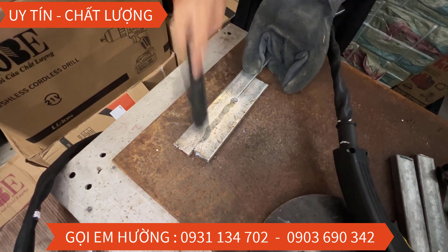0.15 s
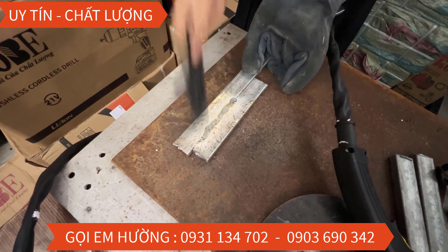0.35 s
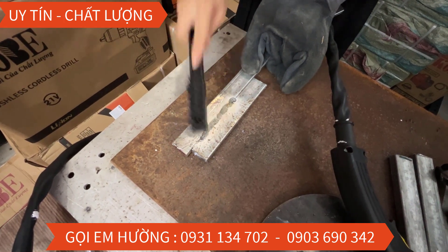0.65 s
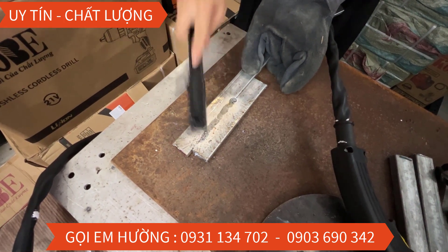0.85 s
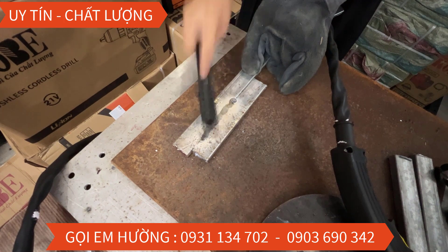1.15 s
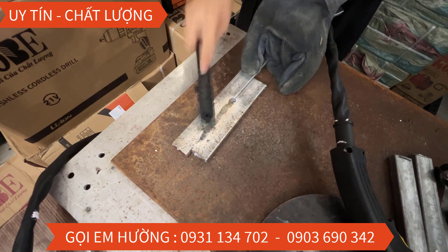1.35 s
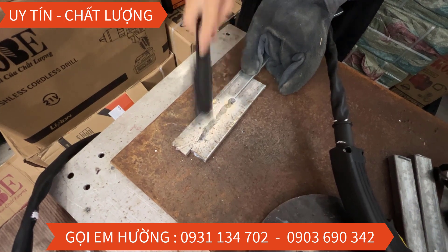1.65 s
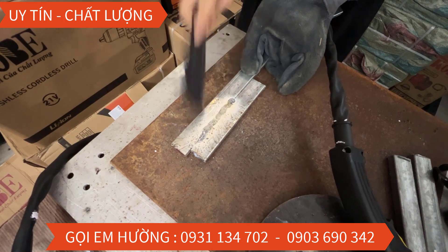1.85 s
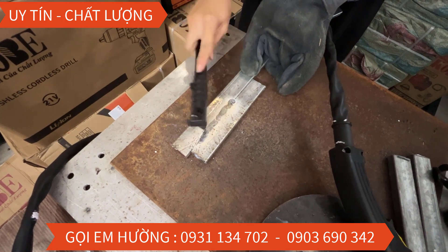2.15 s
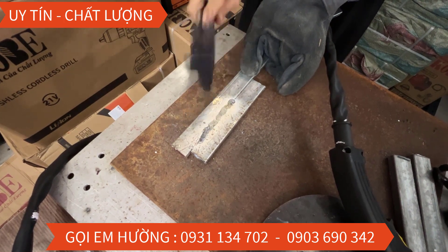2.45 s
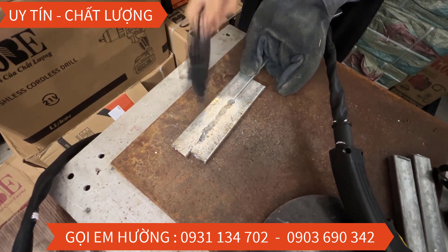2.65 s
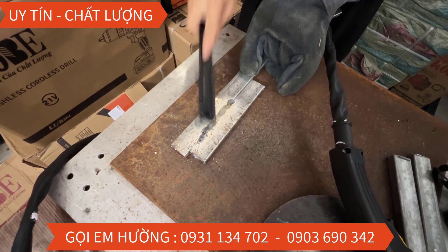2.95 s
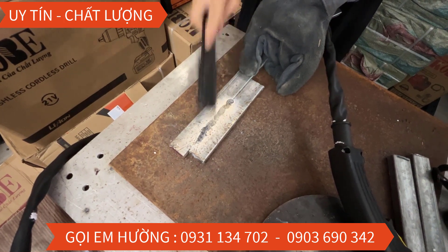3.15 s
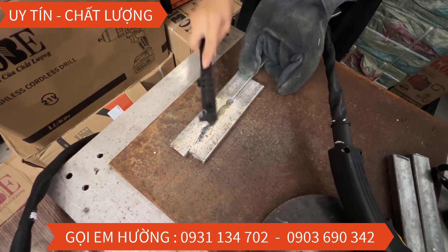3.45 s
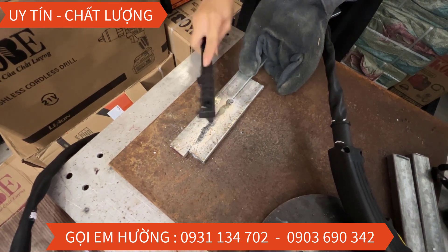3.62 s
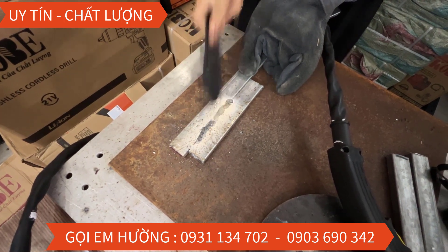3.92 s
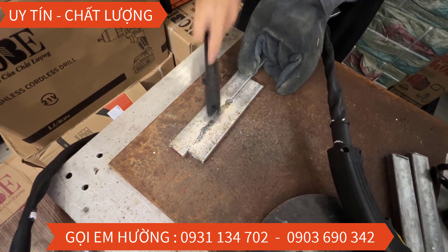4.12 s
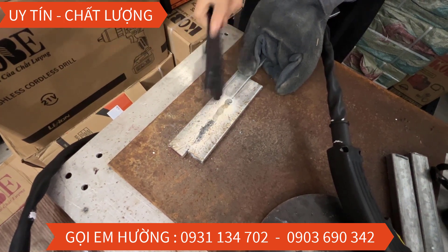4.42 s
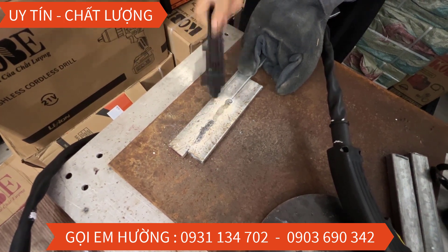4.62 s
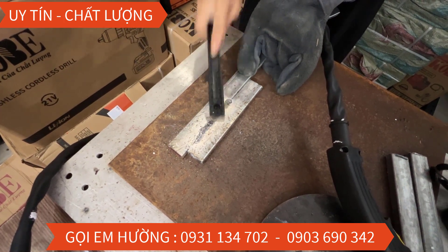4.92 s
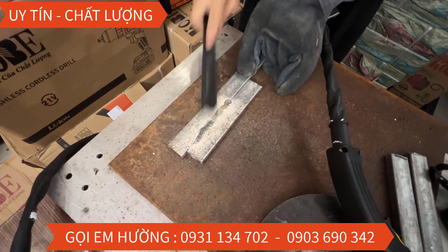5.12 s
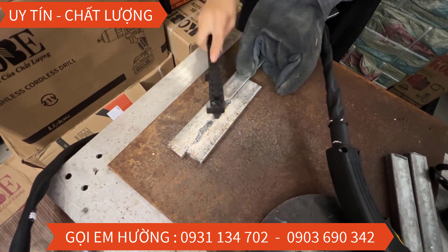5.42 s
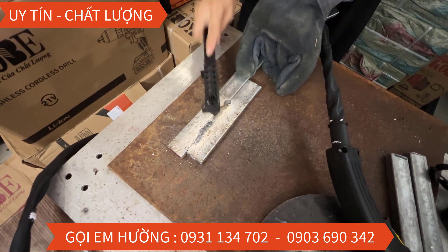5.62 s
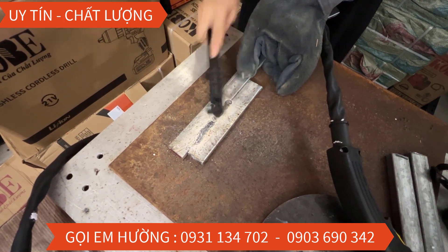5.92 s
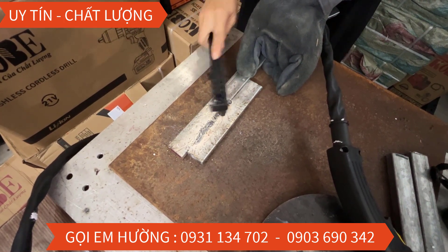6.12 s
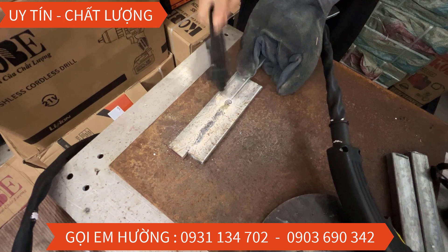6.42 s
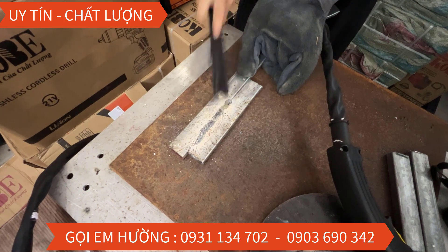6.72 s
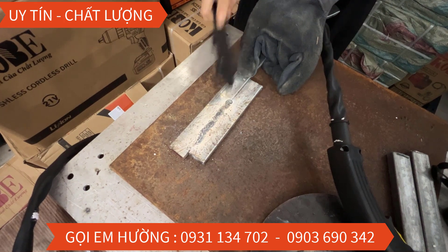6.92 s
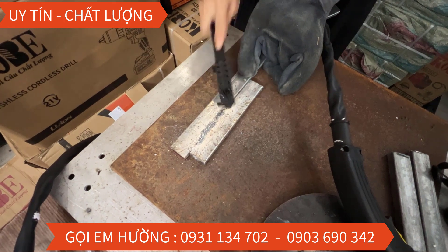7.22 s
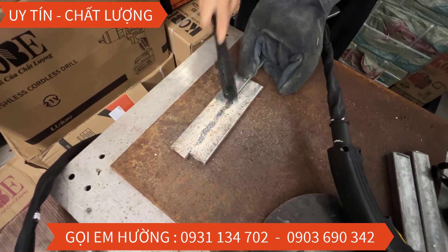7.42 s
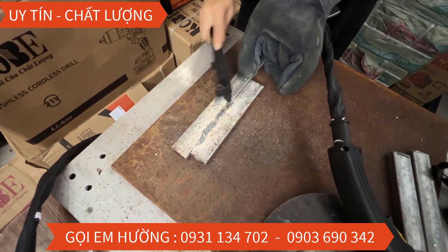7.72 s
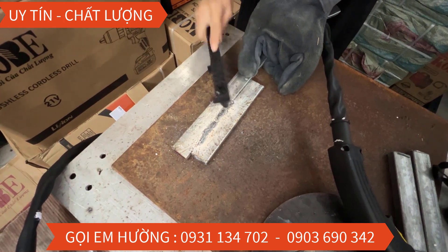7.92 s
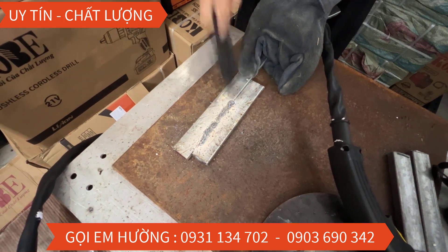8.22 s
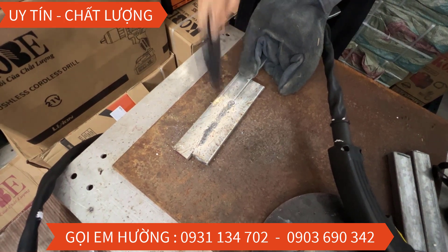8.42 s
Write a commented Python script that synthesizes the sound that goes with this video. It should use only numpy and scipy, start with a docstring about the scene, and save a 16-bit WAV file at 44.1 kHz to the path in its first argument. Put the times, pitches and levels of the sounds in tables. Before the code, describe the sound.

A steel chipping hammer taps fast and evenly along a weld bead, sharp metallic clacks with brief rings and low bench thuds.

```python
"""Sharp metallic clacks, five or six a second: a steel chipping hammer taps along a weld bead on a held-down strip.
Each blow is a dispersed burst of noise, then dense noise partials and decaying, beating sines for the ringing
steel, in a mix of modes that changes as the point walks up the bead.
Low, filtered noise makes the bench thud underneath; a small, cluttered workshop answers with decaying noise,
over a faint rumble of steady noise."""
import sys
import numpy as np
from scipy import signal
from scipy.fft import rfft, irfft, next_fast_len
from scipy.io import wavfile

SR = 44100
rng = np.random.default_rng(int(sys.argv[2]) if len(sys.argv) > 2 else 0)


def file_out(sig):
    """Save sig as 16-bit WAV at sys.argv[1]."""
    # one column per channel
    cols = np.atleast_2d(sig).T
    # limit, then scale
    lim = np.clip(cols, -1, 1)
    pcm = np.round(lim * 32767).astype(np.int16)
    wavfile.write(sys.argv[1], SR, pcm)


N = 377693
SIZE = 24576  # samples given to each blow
AGE = np.arange(SIZE) / SR  # seconds since a blow


def undb(db):
    """Level to amplitude: 20 dB is a factor of ten."""
    return 10 ** (np.asarray(db) / 20)


def fade(t60):
    """Exponential damping: the amplitude loses 60 dB in t60 seconds."""
    return np.exp(-np.log(1000) * AGE / t60)


def unit(x):
    """Energy normalisation: the squares sum to one."""
    return x / np.sqrt(np.sum(x ** 2))


def colour(x, points, tilt_db=0, lift_db=0):
    """Minimum-phase filtering through (Hz, dB) points; tilt_db raises treble against mids, lift_db adds resonances."""
    size = x.shape[-1]
    hz, db = np.transpose(points)
    log_f = np.log(np.maximum(np.fft.rfftfreq(size, 1 / SR), 1))
    tilt = np.interp(log_f, np.log([2500, 8000]), [-.35, .65])
    bass_cut_db = 20 * np.maximum(np.log(hz[0]) - log_f, 0)  # below the first point
    response_db = np.interp(log_f, np.log(hz), db) + tilt_db * tilt + lift_db - bass_cut_db
    # folding the cepstrum onto positive times makes the filter causal
    cepstrum = irfft(np.log(undb(response_db)), size)
    cepstrum[1:size // 2] *= 2
    cepstrum[size // 2 + 1:] = 0
    return irfft(rfft(x) * np.exp(rfft(cepstrum)), size)


def field(size=SIZE, apart_hz=1100, bass_side=0.4):
    """Diffuse-field coherence: stereo white noise, much alike in the bass and unrelated in the treble."""
    mid, side = rfft(rng.standard_normal((2, size)))
    share = np.clip(bass_side + np.fft.rfftfreq(size, 1 / SR) / apart_hz / 2, 0, 1)
    left_right = np.array([mid + share * side, mid - share * side])
    return irfft(left_right / np.sqrt(1 + share ** 2), size)


def vary(pattern, fresh):
    """Partial correlation: the same vibration pattern struck again, with a share of its power new."""
    fresh = np.clip(fresh, 0, 1)
    return np.sqrt(1 - fresh) * pattern + np.sqrt(fresh) * field()


def partials(noise, spacing_hz=22, spread_db=5):
    """Modal density: gather a noise into close, unequal partials, as a crowd of weak modes does."""
    hz = np.fft.rfftfreq(SIZE, 1 / SR)
    heights = rng.standard_normal(len(hz))
    height_db = spread_db * np.interp(hz / spacing_hz, np.arange(len(hz)), heights)
    ringing = irfft(rfft(noise) * undb(height_db), SIZE)
    return ringing / ringing.std()


def disperse(x, lag_s):
    """Dispersion: bending waves travel faster the higher they are; lag_s is the travel time at 1 kHz."""
    hz = np.fft.rfftfreq(SIZE, 1 / SR)
    phase = 4 * np.pi * lag_s * np.sqrt(1000 * hz)
    # time counts from the arrival of the highest waves
    phase = phase - hz * (phase[-1] - phase[-2]) / hz[1]
    return irfft(rfft(x) * np.exp(-1j * phase), SIZE)


def along(place, near, middle, far):
    """Linear interpolation at a place along the bead, 0 near end to 1 far end."""
    toward_near = np.clip(1 - 2 * place, 0, 1)
    toward_far = np.clip(2 * place - 1, 0, 1)
    return middle + (near - middle) * toward_near + (far - middle) * toward_far


def workshop():
    """Stationary noise shaped by resonance: soft, low room noise that gathers near 106 Hz."""
    # Steady background spectrum. Each row: frequency in Hz, relative level in dB per Hz.
    air_spectrum = [(25, -16), (55, -8), (85, -5), (106, 3), (135, -4), (260, -5), (700, -14), (2000, -20),
                    (6000, -33), (14000, -52)]
    # The background settles after the first seconds. Each row: time in seconds, level in dB.
    air_level = [(0, -50.5), (1.3, -60.5), (2.3, -61.5), (3, -65), (6.5, -62), (8.5, -61)]
    air = colour(field(size=next_fast_len(N)), air_spectrum)[:, :N]
    level_db = np.interp(np.arange(N) / SR, *np.transpose(air_level))
    return undb(level_db) * air / air.std()


def walls(pattern, bright_db, t60=0.2, rise_s=0.022, linger_t60=1.0, linger_db=-24, gain_db=4):
    """Reverberation: reflections build up and die away, nearly alike for every blow; a faint ring lingers."""
    # The workshop's reverberation. Each row: frequency in Hz, relative level in dB.
    room_spectrum = [(130, -15.5), (280, -8.5), (700, -8.5), (950, 0.3), (1350, -0.5), (1900, 4.5),
                     (3000, -3.5), (3900, -4.5), (5000, -2), (6000, -8.5), (8800, -11), (10500, -19.9),
                     (13000, -27), (15000, -62)]
    decay = fade(t60) + undb(linger_db) * fade(linger_t60)
    envelope = decay * (1 - np.exp(-AGE / rise_s))
    reflections = vary(pattern, fresh=0.15) * unit(envelope)
    return undb(gain_db) * colour(reflections, room_spectrum, bright_db)


def bench(pattern, t60=0.18, rise_s=0.0012, gain_db=0):
    """Inertia of a large mass: the heavy bench answers low, with a damped thud."""
    # The bench top giving under a blow. Each row: frequency in Hz, relative level in dB.
    thud_spectrum = [(22, -14), (36, -6.5), (54, 2), (75, 1), (110, -0.5), (170, -6), (300, -9.5),
                     (900, -59)]
    envelope = fade(t60) * (1 - np.exp(-AGE / rise_s))
    return undb(gain_db) * colour(vary(pattern, fresh=0.12) * unit(envelope), thud_spectrum)


def dense_ring(pattern, bright_db, lift_db, t60=0.11, rise_s=0.02, gain_db=2.0):
    """Modal overlap: bending waves spread through the plate and fill it with overlapping modes."""
    # The crowd of weak, quickly damped modes of plate and bench.
    # Each row: frequency in Hz, relative level in dB.
    ring_spectrum = [(130, -2.4), (280, 2), (700, 4), (950, 2.5), (1350, 14), (1900, 11.5), (3000, 12.5),
                     (3900, 5.5), (5000, 6.5), (6000, 5.5), (8800, -4), (10500, -6.5), (13000, -8),
                     (15000, -17)]
    envelope = fade(t60) * (1 - np.exp(-AGE / rise_s))
    crowd = vary(pattern, fresh=0.15) * unit(envelope)
    return undb(gain_db) * colour(crowd, ring_spectrum, bright_db, lift_db)


def steel_modes(place, boom_db, ring_db, scatter_db=3.0, detune=0.0017, beat_hz=16, beat_depth=0.33,
                rise_s=0.0036, gain_db=0):
    """Modal superposition: the landing place sets the mix, and the holding hand shifts the modes a little."""
    # Modes of bench, plate and hammer. Each row: frequency in Hz, t60 in seconds, energy in dB
    # struck at the near end, at the middle and at the far end, phase lead of the left in radians.
    mode_rows = [(107, 0.35, -22.5, -24.0, -23.2, 0), (222, 0.25, -22.4, -26.6, -27.3, 0),
                 (290, 0.22, -20.5, -26.1, -26.3, 0), (571, 0.18, -19.1, -20.7, -22.7, 0),
                 (361, 0.19, -23.2, -24.4, -27.9, -0.0), (912, 0.15, -4.2, -1.5, -1.8, 0.0),
                 (938, 0.18, -7.6, -2.9, -3.6, 0.1), (1128, 0.17, -11.9, -4.2, -5.6, -0.5),
                 (1550, 0.17, -5.7, -9.8, -20.3, -0.4), (1723, 0.2, -1.3, -2.2, -7.8, 2.9),
                 (1760, 0.15, 1.0, -3.9, -7.8, 3.1), (1844, 0.27, -9.3, -16.0, -8.3, 2.2),
                 (1927, 0.19, -5.5, -9.2, -2.1, 1.9), (1962, 0.17, -2.1, -6.9, -2.5, 0.7),
                 (2102, 0.15, -7.2, -8.8, -15.5, -2.5), (2366, 0.3, -8.1, -11.5, -13.0, 0.4),
                 (2536, 0.34, -13.9, -18.5, -20.8, -0.5), (2799, 0.2, -7.0, -11.1, -11.8, 1.6),
                 (2964, 0.25, -4.7, -7.6, -13.1, 2.4), (3141, 0.18, -6.7, -7.3, -10.4, 0.5),
                 (3513, 0.26, -12.5, -25.0, -27.0, -2.5), (4245, 0.32, -16.9, -20.0, -20.6, 0.9),
                 (4398, 0.21, -17.8, -25.2, -17.1, 0.9), (4853, 0.25, -17.6, -17.3, -18.0, 1.9),
                 (5195, 0.24, -10.9, -17.3, -17.9, -0.4), (5663, 0.29, -19.6, -22.0, -19.5, -0.9),
                 (6557, 0.32, -14.5, -15.8, -25.8, 1.0), (9022, 0.38, -16.6, -17.9, -20.5, -2.1),
                 (12102, 0.33, -26.3, -27.6, -28.0, -0.2), (14602, 0.33, -24.7, -15.2, -22.3, 1.8)]
    hz, t60, *levels, lead = np.transpose(mode_rows)
    loud, sharp, start, split = rng.standard_normal((len(hz), 4)).T
    group_db = np.where(abs(hz - 1000) < 200, boom_db, ring_db)  # the boom is the group near 1 kHz
    db = along(place, *levels) + group_db + scatter_db * loud + gain_db
    # each mode beats against its close neighbours
    beat_phase = 2 * np.pi * beat_hz * split[:, None] * AGE
    beating = 1 + beat_depth * np.sin(beat_phase.astype(np.float32))
    envelope = fade(t60[:, None]) * (1 - np.exp(-AGE / rise_s)) * beating
    amplitude = undb(db) * np.sqrt(2 / np.sum(envelope ** 2, axis=1))
    struck_hz = hz * (1 + detune * sharp)
    right_phase = 2 * np.pi * (struck_hz[:, None] * AGE + start[:, None])
    left_phase = right_phase + lead[:, None]
    return np.array([amplitude @ (envelope * np.sin(phase.astype(np.float32)))
                     for phase in (left_phase, right_phase)])


def strip_lift(place, scatter_db=1.2):
    """Resonance: the strip's lift in dB over frequency; no two blows land on quite the same spot."""
    # Broad resonances of the hand-damped strip. Each row: frequency in Hz, width in Hz, lift in dB
    # struck at the near end, at the middle and at the far end.
    strip_rows = [(947, 175, 6, 20, 19), (1740, 116, 8, 10, 1.2), (1909, 120, 18, 2.9, 15.7),
                  (2364, 170, 3.5, 9, 6.8), (2800, 180, 2.5, 6, 0.9), (2945, 95, 7.5, 2.2, 5.2),
                  (3620, 260, 1.5, 6.6, 0.45), (4246, 370, 6.7, 3.9, 8.2), (4750, 240, 5.5, 6.4, 1.5),
                  (5199, 130, 15.5, 4.7, 8.2), (5326, 100, -7, 0.54, 8.2), (7400, 116, 6.5, 2.9, 7),
                  (7670, 600, 10, 4.6, 1.3), (8930, 740, 6, 5.6, 4.5)]
    hz, width, *lifts = np.transpose(strip_rows)
    db = along(place, *lifts) + scatter_db * rng.standard_normal(len(hz))
    distance = (np.fft.rfftfreq(SIZE, 1 / SR) - hz[:, None]) / width[:, None]
    return db @ np.exp(-2 * distance ** 2)


def crack(pattern, bright_db, lift_db, t60=0.025, rise_s=0.0016, bite_t60=0.013, bite_db=6,
          rebound_s=0.0018, rebound_db=-6, scatter_db=3, lag_s=0.001802, gain_db=0.45):
    """Impact and rebound: the point bites through the slag, then the strip slaps back on the plate."""
    # The contact itself. Each row: frequency in Hz, relative level in dB.
    contact_spectrum = [(130, -13.5), (280, -5.5), (700, 6.5), (950, 7), (1350, 13), (1900, 10),
                        (3000, 13.5), (3900, 12.5), (5000, 8), (6000, 8), (8800, 5.5), (10500, 1.5),
                        (13000, -1), (15000, -4.5)]
    late, strong = rng.standard_normal(2)
    decay = fade(t60) + undb(bite_db) * fade(bite_t60)
    contact = decay * (1 - np.exp(-AGE / rise_s))
    slap = np.interp(AGE - rebound_s * np.exp(late / 3), AGE, contact, left=0)
    envelope = np.hypot(contact, undb(rebound_db + scatter_db * strong) * slap)
    noise = vary(pattern, fresh=0.83) * unit(envelope)
    burst = colour(noise, contact_spectrum, bright_db, lift_db)
    return undb(gain_db) * disperse(burst, lag_s)


def hammering():
    """Impact excitation: each blow cracks, rings, thuds and echoes; square blows and a loose strip ring on more."""
    # Hammer blows relative to a typical one. Each row: start in seconds, strength of steel and room in dB,
    # bite in dB (a square blow is brighter than a glancing one), bench thud in dB.
    blows = [(0.0371, -0.8, -1.5, -2), (0.2423, -2.5, 0.5, 3), (0.449, -0.6, -2, 2), (0.6474, -1.4, 0.5, 7),
             (0.8394, -1.8, -1, 2), (1.0341, -0.4, 0.5, 4), (1.2345, 0, 1, 4), (1.432, 0.5, -2, -2),
             (1.628, -0.1, 0.5, -1), (1.8155, -0.3, 1.4, 9.5), (2.0139, 0, 2, 2), (2.2074, 0.3, 1, 14.5),
             (2.3946, -0.1, -3, 0), (2.5815, 0.7, 1.6, 4), (2.7668, -0.5, 1.5, 1), (2.9434, 0.5, 0.5, 5),
             (3.1261, -3.5, -6, -12), (3.3095, -1.2, 3, 6.4), (3.4862, -1.5, -1.5, -8),
             (3.6681, 0, 2.5, 10.4), (3.8465, -2, -0.5, 1.5), (4.0256, 0.1, 2, -2), (4.2015, -2, 2, 5),
             (4.3744, -1.1, -3.5, -4), (4.5517, -0.5, -3, -7), (4.7327, -1, 0.2, 9.5),
             (4.9133, -2, -0.5, -2), (5.0986, 1, 1, 8), (5.2816, 0.3, -0.9, -5), (5.462, 0.3, 0.5, 2),
             (5.6402, -0.5, 0, 6.5), (5.814, -2.5, 0, -6), (5.991, -1.2, 1, 4), (6.1758, -2.5, 1.5, 2),
             (6.3567, -2, 1.5, 6), (6.531, -3, 0, 1), (6.703, -4.5, 0, -10), (6.8791, -3.5, 1.5, -1),
             (7.0567, -1.5, 0, 10.5), (7.2366, -3, 0.5, -4), (7.4145, -2, -2, -6), (7.5999, -1.6, 0, -4),
             (7.7804, -2.5, 2.5, 5.5), (7.9568, -3.5, 3.5, 12.6), (8.1394, -1.5, -7.5, 0),
             (8.326, -1, -3.5, 4.5), (8.525, -3.5, 7, 6.5)]
    # Where the point lands. Each row: time in seconds, place along the bead (0 near end to 1 far end).
    place_curve = [(0, 0.084), (1.5, 0.12), (3.2, 0.43), (5.2, 0.41), (6.6, 0.86), (8.5, 0.92)]
    # How freely the strip rings on. Each row: time in seconds, looseness (0 held flat to 1 loose).
    loose_curve = [(0, 1), (2.03, 0.77), (2.2, 0.38), (3.5, 0.13), (5.5, 0.12), (6.3, 0.085), (7.3, 0.13),
                   (7.7, 0.68), (8.5, 0.12)]
    # The plate's boom near 1 kHz as the point moves on. Each row: time in seconds, level in dB.
    boom_curve = [(0, 0.5), (2.0, 0), (2.22, 5), (2.6, -5), (3.4, 0), (5.55, 0), (6.75, -5.5), (7.3, 1.5),
                  (8.301, 2)]
    # level in dB with the strip held flat, dB gained when it is loose, dB per dB of bite
    ring_held_db, ring_loose_db, ring_per_bite = -2.5, 2.5, 0.29
    tail_held_db, tail_loose_db, tail_per_bite = -0.6, 8.5, 0.41
    typical_bright_db = 3  # treble of a typical blow against its mids
    boom_per_bite = -0.11  # dB per dB: a square blow presses the plate down and booms less

    out = np.zeros((2, N + SIZE))
    contact, frame = field(), field()
    plate, room = partials(field()), partials(field())
    for s, strength_db, bite_db, thud_db in blows:
        place, loose, boom_db = (np.interp(s, *np.transpose(curve))
                                 for curve in (place_curve, loose_curve, boom_curve))
        ring_db = ring_held_db + ring_loose_db * loose + ring_per_bite * bite_db
        tail_db = tail_held_db + tail_loose_db * loose + tail_per_bite * bite_db
        bright_db = typical_bright_db + bite_db
        lift_db = strip_lift(place)
        steel = crack(contact, bright_db, lift_db)
        steel += undb(ring_db) * dense_ring(plate, bright_db, 0.73 * lift_db)
        steel += steel_modes(place, boom_db + boom_per_bite * bite_db, ring_db)
        steel += undb(tail_db) * walls(room, bright_db)
        start = int(s * SR)
        out[:, start:start + SIZE] += undb(strength_db) * steel + undb(thud_db) * bench(frame)
    return out[:, :N]


def scene():
    """Linear superposition: the hammering over the workshop's background."""
    return hammering() + workshop()


def record(dry, ceiling=1.0, top_hz=16000):
    """Transduction: two unlike microphone ports, saturation that rounds the tallest peaks, and a low-pass."""
    # How differently the ports hear. Each row: frequency in Hz, left minus right in dB.
    port_balance = [(150, 0), (360, -3), (800, 2.5), (1500, 2), (2700, 2), (3900, 6), (5200, 11), (6200, 7),
                    (7400, 0), (8800, -5), (11500, 0)]
    size = next_fast_len(N)
    lean_db = np.interp(np.fft.rfftfreq(size, 1 / SR), *np.transpose(port_balance))
    heard = irfft(rfft(dry, size) * undb([lean_db / 2, -lean_db / 2]), size)[:, :N]
    rounded = ceiling * np.tanh(heard / ceiling)
    low_pass = signal.ellip(8, .2, 70, top_hz, fs=SR, output="sos")
    return signal.sosfilt(low_pass, rounded)


dry = scene()
out = record(dry)
file_out(out)
```